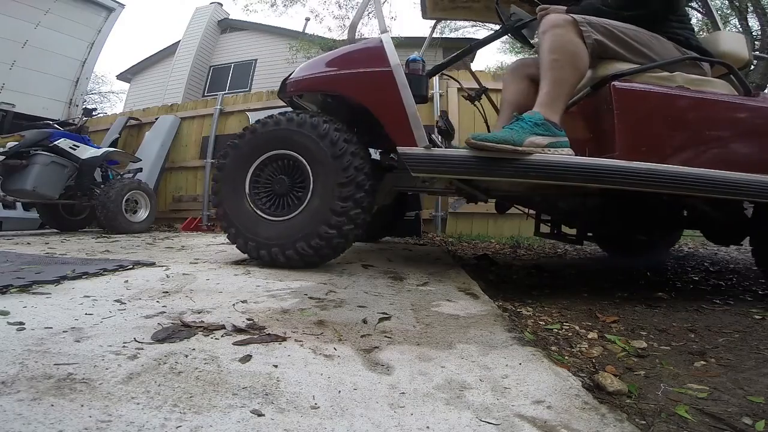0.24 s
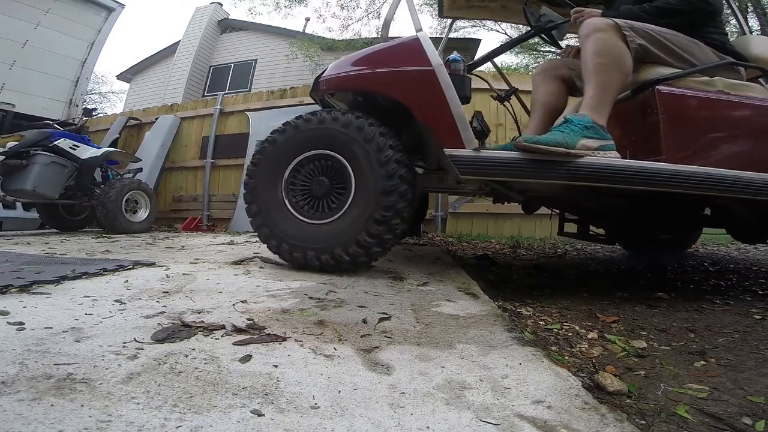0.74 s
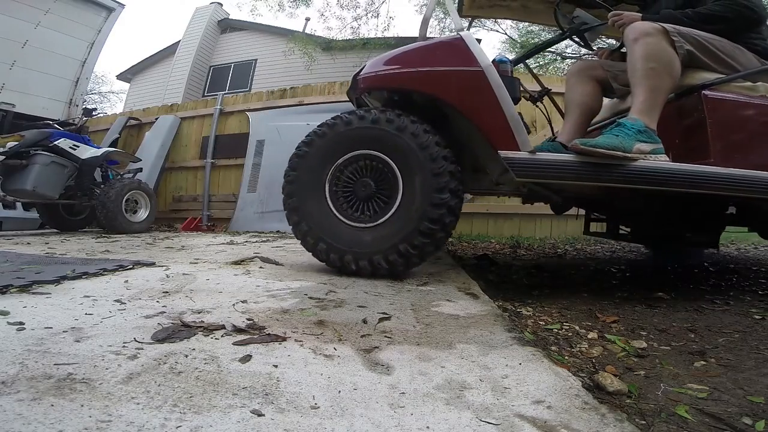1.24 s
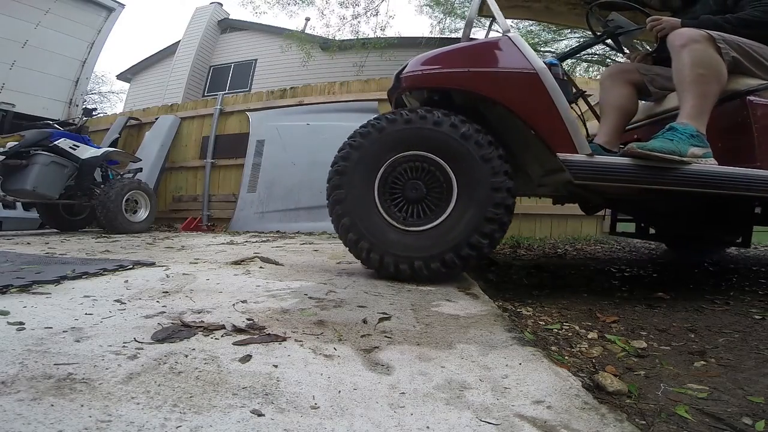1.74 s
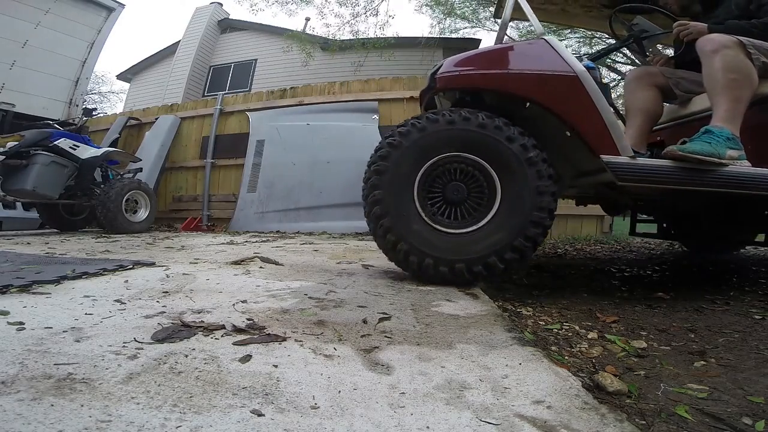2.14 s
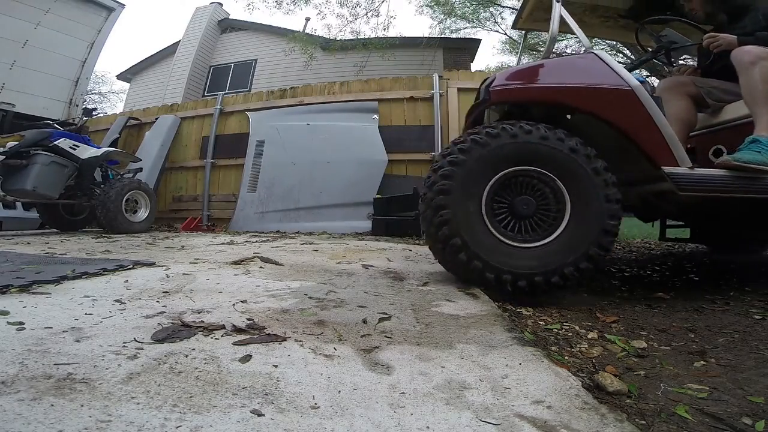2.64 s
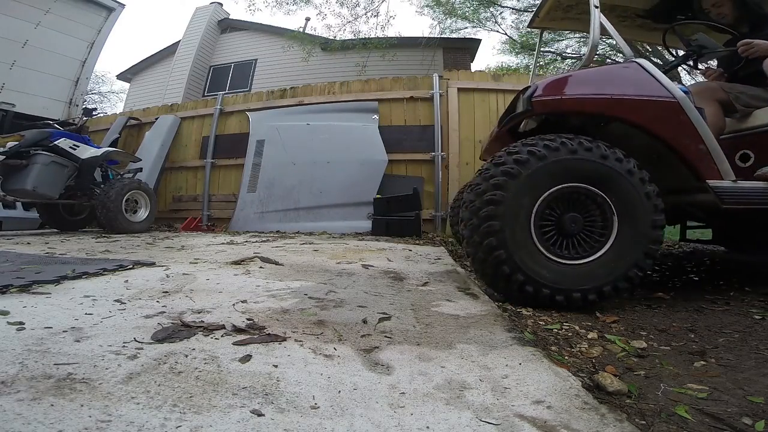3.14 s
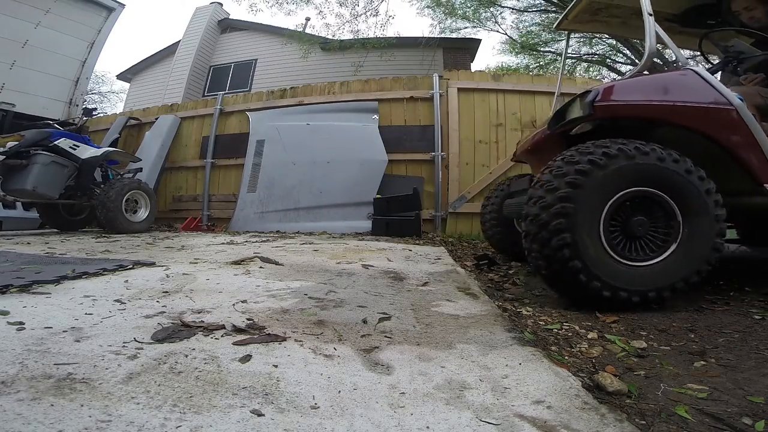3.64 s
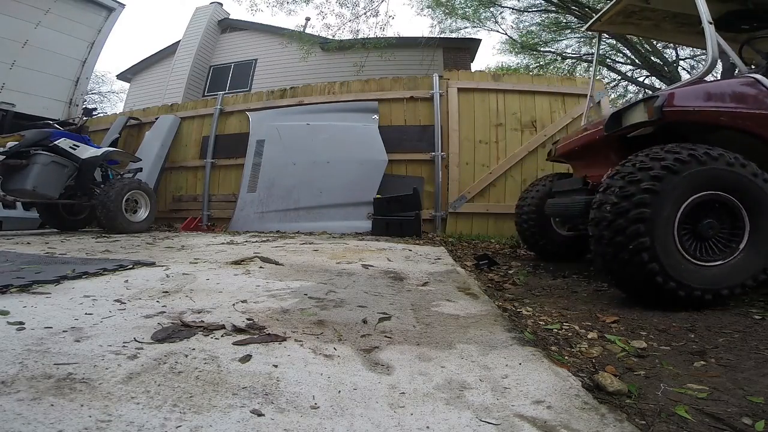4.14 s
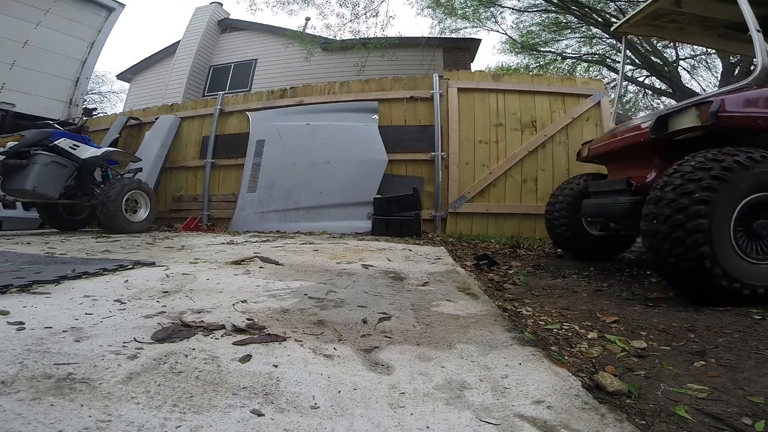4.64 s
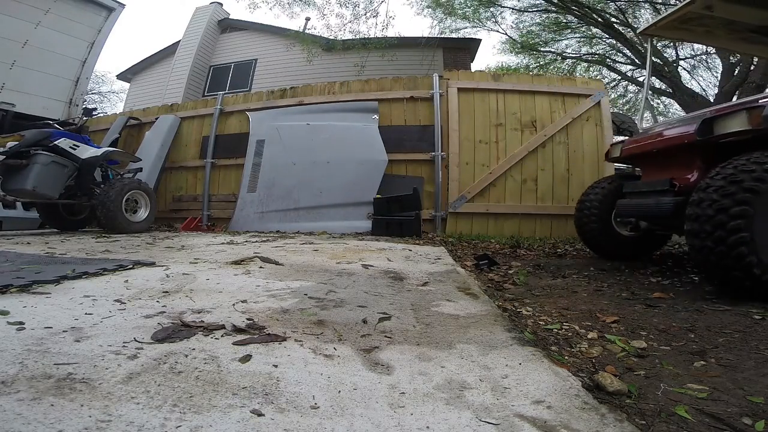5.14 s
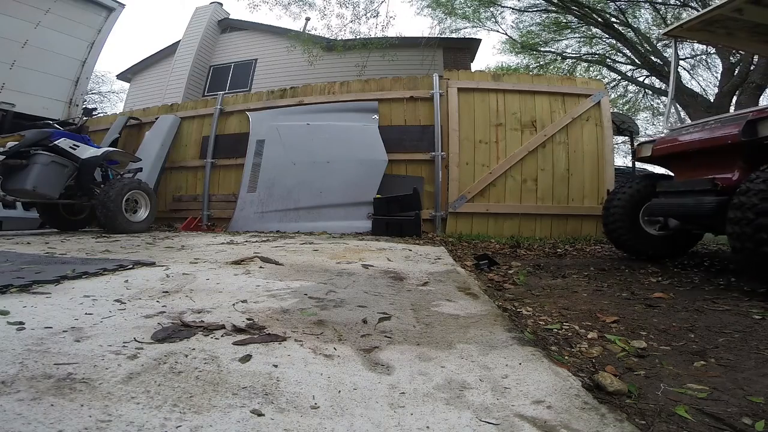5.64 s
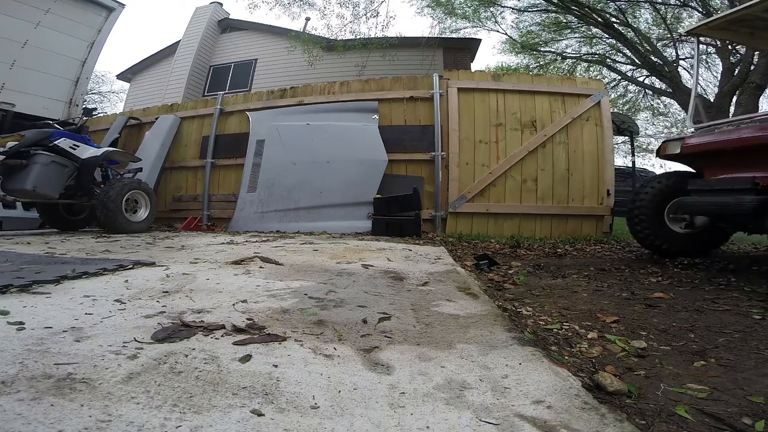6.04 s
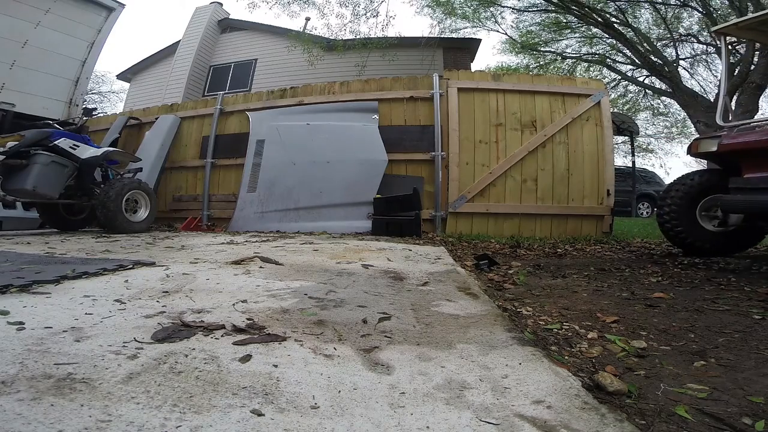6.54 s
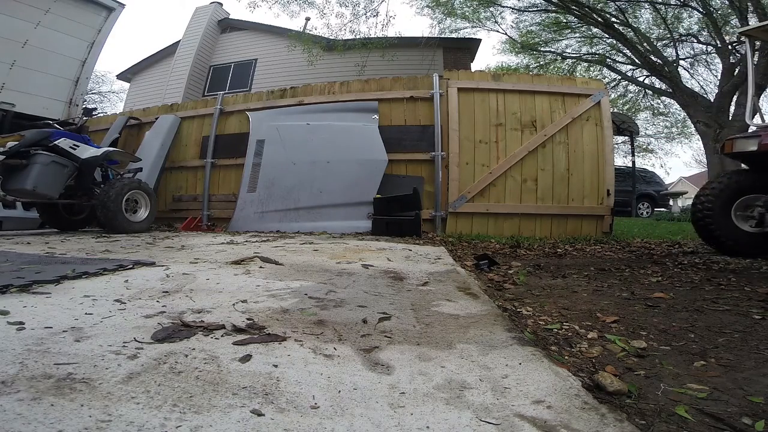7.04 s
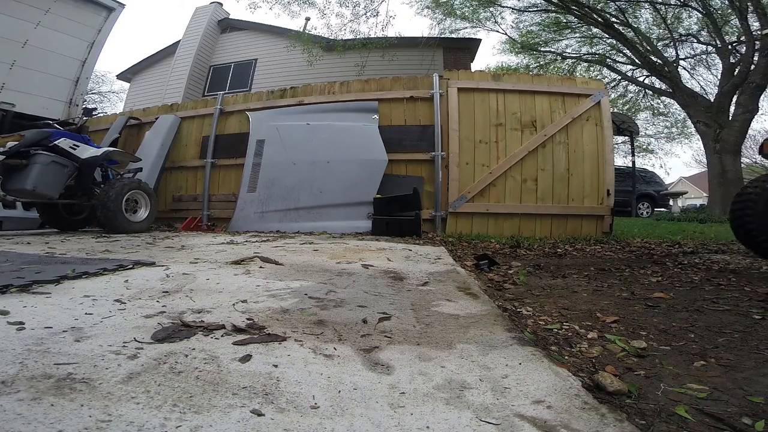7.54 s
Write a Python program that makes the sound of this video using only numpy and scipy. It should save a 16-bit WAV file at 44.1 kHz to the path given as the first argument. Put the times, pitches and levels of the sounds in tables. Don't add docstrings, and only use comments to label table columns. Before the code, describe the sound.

A small single-cylinder gas engine is running loudly from the first instant, close to a low outdoor microphone. About 27 rough firings a second merge into a throaty, hollow chug, with a muffler note around 350 Hz, sheet-metal knock, sharp gas puffs and a fine metallic buzz. Fence and house wall add very short reflections. As the cart backs away the pace climbs gently to about 32 by 3 s, with panel slaps and thuds early on and around 1.5-2.1 s, while loose panels briefly hum. From 3.4 s it revs quickly, peaking near 4 s at about 43 firings a second, with clustered rattling jolts and a singing panel just after. It eases down until nearly 6 s, with scattered knocks, then drives on steadily and slightly faster, still running at 7.8 s. Loud peaks are rounded and deepest bass is thin.

```python
import sys
import numpy as np
from scipy import signal
from scipy.fft import rfft, irfft
from scipy.io import wavfile

SR = 44100
rng = np.random.default_rng(int(sys.argv[2]) if len(sys.argv) > 2 else 0)


def volts(x):
    e = np.asarray(x, float) / 20
    return 10 ** e


def unload_audio(sound):
    columns = np.transpose(np.atleast_2d(sound))
    steps = np.round(np.clip(columns, -1, 1) * 32767)
    wavfile.write(sys.argv[1], SR, steps.astype(np.int16))


N = 343098


def evened(x):
    return x / np.sqrt(np.mean(x ** 2) + 1e-20)


def curves(rows):
    s, *columns = np.transpose(rows)
    return [np.interp(np.arange(N) / SR, s, c) for c in columns]


def delayed(x, ms):
    n = np.arange(N)
    return np.interp(n - ms * SR / 1000, n, x, 0)


# time in s, wall echo delay in ms, echo share 0-1,
# extra delay of the higher rings in ms, turn from 0 side-on to 1 nose-on.
PATHS = [
    (0, 9.54, 0.33, 3.5, 0.0092),
    (1, 7.5, 0.32, 4, 0.037),
    (2, 8.6, 0.04, 4, .2),
    (2.4, 9.2, 0.1, 1.65, 0.45),
    (3.3, 8.3, 0.1, 1.4, 0.67),
    (4, 8.3, 0.24, 0.78, 0.59),
    (5, 6.85, 0.11, 0.5, 0.96),
    (6, 9., 0.24, 0.34, 0.77),
    (7, 6.9, 0.36, 0, 0.41),
    (7.78, 8.9, 0.45, 2.5, 0.76),
]


def walls(x):
    delay_ms, share, _, _ = curves(PATHS)
    first = share * delayed(x, delay_ms)
    second = 1.09 * share * delayed(x, 2.2 * delay_ms)
    return (x + first + second) / np.sqrt(1 + share ** 2)


def higher_delay_ms():
    return curves(PATHS)[2]


def nose_on():
    return curves(PATHS)[3]


def resonate(x, hz, width_hz):
    turn = np.exp(2j * np.pi * np.cumsum(hz * np.ones(len(x))) / SR)
    r = np.exp(-np.pi * width_hz / SR)
    return turn * signal.lfilter([1 - r], [1, -r], x / turn)


def ring(x, modes, quick=5.3):
    turn = nose_on()
    total = 0
    for hz, width_hz, side_db, nose_db in modes:
        tone = resonate(resonate(x, hz, width_hz), hz, quick * width_hz).imag
        total = total + volts(side_db + turn * (nose_db - side_db)) * tone
    return evened(total)


def coloured(x, points):
    hz, db = np.transpose(points)
    f = np.fft.rfftfreq(N, 1 / SR) + 1
    gain = volts(np.interp(np.log(f), np.log(hz), db, -90, -90))
    return evened(irfft(rfft(x) * gain, N))


def bands(parts):
    octave = np.log2(np.fft.rfftfreq(N, 1 / SR) + 1)
    share = [np.interp(octave, np.log2([4000, 6500, 10500]), np.sqrt(row)) for row in np.eye(3)]
    return irfft(sum(np.sqrt(s) * rfft(evened(x)) for s, x in zip(share, parts)), N)


def swell(clicks, rise_ms, fall_ms, between):
    ms = np.arange(SR // 10) * 1000 / SR
    burst = (1 - np.exp(-ms / rise_ms)) * np.exp(-ms / fall_ms)
    shape = signal.oaconvolve(clicks, burst)[:N]
    return (evened(shape) + between) * rng.standard_normal(N)


# time in s, engine load in dB, tailpipe beam towards the listener in dB,
# view into the engine bay in dB.
DRIVE = [(0, 1, -5, -2), (.3, 1, -4.5, -2.5), (.8, -0.5, 0.5, 0), (1.3, -1.5, -1.5, 0.5), (1.75, 0.5, 1, 0),
         (2.1, -2, -0.5, 1.5), (2.5, -1, 2.5, 2), (3.3, -2.5, 2.5, 2), (3.45, 0.5, 3, 0), (4.02, 1, 1, 0),
         (4.22, -2, 3, 0), (4.8, -0.5, 1.2, 0), (5.2, -0.5, 2.5, -0.5), (5.6, -0.5, -1, -1.5),
         (6.1, 0, -0.5, 0.1), (6.8, 0, -1, -2.5), (7.2, -1.1, -0.5, -2), (7.78, -0.8, -2.5, -0.5)]
# level in dB, then dB per dB of load, per dB of beam,
# per dB of view, dB gained nose-on, dB per s of backing away.
HEARD = dict(boom=(-23, 0.4, 0.27, -0.1, 0.1, 0.74), low=(-21, -0.16, 0.02, -.4, -1.9, 0.34),
         main=(-15.5, -0.14, 1.0, -0.03, -1.25, 0.11), upper=(-22, 1.03, 0.23, 1.23, 1.5, 0.08),
         shroud=(-26, 0.7, 0.3, 0.72, 0.93, 0.3941), puff=(-38.5, 1.4, 0.25, 0.72, 0.1, 0.72),
         rattle=(-45.5, 0.9, 0.13, -0.26, 0.7, 0.16), box=(-3.5, 1.1, 0.4, 0.2, -15, -1.75),
         base=(1.5, 0.9, -0.04, -1.34, -11.5, 0.32))


def heard_db(part):
    db, *shares = HEARD[part]
    return db + np.dot(shares, [*curves(DRIVE), nose_on(), np.arange(N) / SR])


# time in s, rate in firings per s.
SPEED = [(0.0, 26.77), (1.03, 28.16), (1.55, 29.49), (2.0, 28.98), (2.71, 30.8), (2.87, 32.11),
         (3.28, 32.35), (3.39, 33.56), (3.55, 38.05), (3.77, 41.55), (3.94, 42.77), (4.29, 36.36),
         (5.46, 31.77), (5.89, 30.88), (6.94, 31.75), (7.14, 33.15), (7.36, 32.46), (7.78, 34.04)]


def firings(spread_db, late_ms):
    rate, = curves(SPEED)
    at = np.flatnonzero(np.diff(np.floor(np.cumsum(rate) / SR), prepend=-1))
    size, slip = rng.standard_normal((len(at), 2)).T
    moved = np.clip(at + (late_ms * slip * SR / 1000).astype(int), 0, N - 1)
    out = np.zeros(N)
    out[moved] = volts(spread_db * size) / np.sqrt(rate[at])
    return out


# centre in Hz, width in Hz, level side-on in dB, nose-on in dB.
BOOM = [(34.2, 24, -28, -32.5), (60.3, 4.2, -31.5, -27), (104.9, 24.4, 8, 5.5), (134.6, 86.5, 2, -3)]
LOW_PIPE = [(198.4, 35.7, -8.5, -4), (256.2, 67, -0.5, 1), (280.2, 9.1, -5, -27.5)]
UPPER_PIPE = [(427.4, 31.5, -12, 7), (485.6, 40, 3.5, -5), (528.4, 70, -1, 7.5), (569, 74, 2, -3.5),
              (640.5, 72, 0, -8.5)]


def muffler(clicks):
    flow = evened(swell(clicks, rise_ms=1.0, fall_ms=3.7, between=0.21))
    view_db = curves(DRIVE)[2]

    boom = ring(clicks + 0.03 * flow, BOOM, quick=2.43)
    air_box = ring(clicks + 0.06 * flow, [(173.0, 52, 0.00095, 0.0058)], quick=2.8)
    boom = boom - volts(heard_db("box")) * air_box

    low = ring(walls(clicks + 0.06 * flow), LOW_PIPE, quick=1.53)

    start_hz, settled_hz, settle_s = 356.3, 343.1, 0.63
    main_hz = settled_hz + (start_hz - settled_hz) * np.exp(-np.arange(N) / SR / settle_s)
    main = ring(clicks + 0.05 * flow, [(main_hz, 20, 0, 0), (368.5, 46.5, -11.0, -11.5)], quick=4.37)

    stretch = 1 + 0.12 * view_db
    upper_modes = []
    for hz, width_hz, side_db, nose_db in UPPER_PIPE:
        tilt_db = -8.5 * np.log2(hz / 520) * view_db
        upper_modes.append((hz * stretch, width_hz, side_db + tilt_db, nose_db + tilt_db))
    upper = ring(walls(delayed(clicks, higher_delay_ms()) + 0.14 * flow), upper_modes, quick=1.69)

    pipes = volts(heard_db("boom")) * boom + volts(heard_db("low")) * low
    pipes = pipes + volts(heard_db("main")) * main + volts(heard_db("upper")) * upper

    side_share, nose_share = 0.83, 0.41
    swallowed = side_share + nose_on() * (nose_share - side_share)
    return pipes - swallowed * 2 * resonate(pipes, 408, width_hz=43).real


# centre in Hz, width in Hz, level side-on in dB, nose-on in dB.
SHROUD = [
    (774, 16.6, -0.5, -6),
    (977, 50, -20, -7.5),
    (1086, 120, -9.5, -14),
    (1200, 9, -22.5, -31),
]


def shroud(clicks):
    uneven = clicks * volts(6.0 * rng.standard_normal(N))
    clatter = evened(swell(uneven, rise_ms=0.36, fall_ms=24.0, between=0.71))
    valve = 0.36 * nose_on() * delayed(clicks, 19.0)
    knock = walls(delayed(clicks + valve + 0.4 * clatter, higher_delay_ms()))

    face_hz = 867 + 4 * (curves(SPEED)[0] - 31)
    base_db = heard_db("base")
    front = ring(knock, [(face_hz, 55, 0, 0), (705, 55, base_db, base_db), SHROUD[0]], quick=3.74)
    side = ring(delayed(knock + 0.82 * clatter, 2.553), SHROUD[1:], quick=4.3)
    return volts(heard_db("shroud")) * (0.84 * front + 0.22 * side)


def crack(clicks):
    uneven = clicks * volts(4.0 * rng.standard_normal(N))
    snap = delayed(uneven, 1.606 + higher_delay_ms())
    width_hz, level_db = 510, -16
    return volts(heard_db("shroud") + level_db) * ring(snap, [(1000, width_hz, 0, 0)], quick=1.02)


# frequency in Hz, density in dB per Hz.
PUFF = [(590, -39), (1000, -3), (1460, -12.5), (1830, -10), (2280, -12), (3440, -17), (3770, -30.5),
        (4000, -16), (5200, -55.5), (8800, -120)]
# centre in Hz, width in Hz, level side-on in dB, nose-on in dB.
PANELS = [
    (1830, 310, 5, -10.5),
    (2000, 360, 5, 6),
    (2744, 40, 12.5, -0.5),
    (3582, 130, 8, 6.5),
    (4170, 390, -11.5, -6.5),
    (5560, 180, -18, 0),
    (7160, 580, -2.5, -12),
]


def puffs():
    gas = walls(swell(firings(spread_db=3.0, late_ms=0.2), rise_ms=0.43, fall_ms=8.1, between=0.92))
    return volts(heard_db("puff")) * (0.84 * coloured(gas, PUFF) + 0.22 * ring(gas, PANELS[:3]))


# frequency in Hz, density in dB per Hz.
RATTLE = [(1650, -24.5), (2800, -5.5), (3190, -6), (3450, -3), (3810, -23.5), (4210, -2.5), (5220, -3),
          (6110, -9), (7950, -11.5), (8770, -18.5), (9670, -18.5), (10500, -24.5), (12100, -23.5),
          (13400, -35), (15300, -43)]


def rattle():
    shake = firings(spread_db=1.5, late_ms=0.6)
    blur = 0.69 + 0.19 * nose_on()
    own = []
    for _ in range(4):
        uneven = shake * volts(4.2 * rng.standard_normal(N))
        own.append(swell(uneven, rise_ms=5.5, fall_ms=9.1, between=blur))

    panels = 0
    for x, mode in zip(own, PANELS[3:]):
        panels = panels + volts(mode[2]) * ring(x, [mode], quick=7.0)

    finest = own[3] * volts(0.81 * curves(DRIVE)[0])
    buzz = coloured(bands([own[1], own[2], finest]), RATTLE)
    return volts(heard_db("rattle")) * (1.068 * buzz + 0.45 * evened(panels))


# time in s, peak in dB, low thud relative to peak in dB.
JOLTS = [(0.115, -27.5, -15.5), (0.222, -26.5, -2.5), (0.4512, -24, -13), (0.5203, -29.5, -17),
         (0.808, -32.5, -6), (1.544, -26.5, -2.5), (1.58, -26, 1), (1.717, -26, -15), (1.78, -24.5, -9.5),
         (1.889, -24.5, -6.5), (2.125, -26.5, 0.5), (3.346, -24.5, -12), (3.4067, -30.5, -2.5),
         (3.433, -24.5, -11), (3.489, -22.5, 1), (3.6, -22.5, 1.5), (3.6966, -25, -1.5), (3.768, -24, -1.5),
         (3.8677, -26, -7), (4.0086, -26, -12.5), (4.29, -30, -6), (4.3744, -28.5, -8.5),
         (4.714, -30.5, -8.5), (4.916, -24, -5.5), (5.0036, -26, 3), (5.37, -26.5, -3), (5.4345, -29, 4.5),
         (5.6562, -31.5, -8), (6.0465, -30.5, -3), (7.631, -30.5, -3.5)]


def jolts():
    low, middle, top = np.zeros((3, N))
    for (s, db, low_db), chance in zip(JOLTS, rng.standard_normal(len(JOLTS))):
        at = round(s * SR)
        low[at] = volts(db + low_db)
        middle[at] = volts(db)
        top[at] = volts(db - 20.5 + 2.2 * chance)

    mixed = (middle + 3 * top) / 2
    slaps = [swell(x, rise_ms=2.4, fall_ms=9.0, between=0) for x in (middle, mixed, top)]
    slap = coloured(bands(slaps), RATTLE)
    thud = coloured(walls(swell(low, rise_ms=1.0, fall_ms=11.0, between=0)), PUFF)
    return volts(-40.0) * np.linalg.norm(middle) * slap + volts(-35.5) * np.linalg.norm(low) * thud


# start in s, end in s, pitch in Hz, level in dB.
HUMS = [
    (1.5, 2.002, 1760, -46),
    (1.704, 2.004, 3400, -48.5),
    (2.1, 2.693, 2080, -48),
    (2.215, 2.785, 1235, -48),
    (3.604, 4.1, 1830, -43.5),
    (4.03, 4.446, 1394, -41),
    (5.2, 5.584, 1990, -52),
    (6.088, 6.695, 1110, -44),
]


def hums(clicks):
    drive = evened(swell(clicks, rise_ms=0.74, fall_ms=16.0, between=0.63)) + 1.2 * clicks
    out = np.zeros(N)
    for start_s, end_s, hz, db in HUMS:
        part = slice(round(start_s * SR), round(end_s * SR))
        tone = evened(resonate(resonate(drive[part], hz, 70.0), hz, 200.0).imag)
        out[part] += volts(db) * tone * signal.windows.tukey(len(tone), 0.4)
    return out


def scene():
    clicks = evened(firings(spread_db=0.7, late_ms=0.05))
    engine = muffler(clicks) + shroud(clicks) + crack(clicks) + puffs()
    panels = rattle() + jolts() + hums(clicks)
    return (engine + panels)[None]


def top_cut(x):
    return signal.sosfilt(signal.butter(12, 15290, fs=SR, output="sos"), x)


def record(dry):
    rounded = 1.14 * np.tanh(-dry / 1.078)
    low_hz = 46.4
    thin = signal.lfilter(*signal.butter(2, low_hz, "high", fs=SR), rounded)
    return top_cut(thin)


dry = scene()
out = record(dry)
unload_audio(out)
```